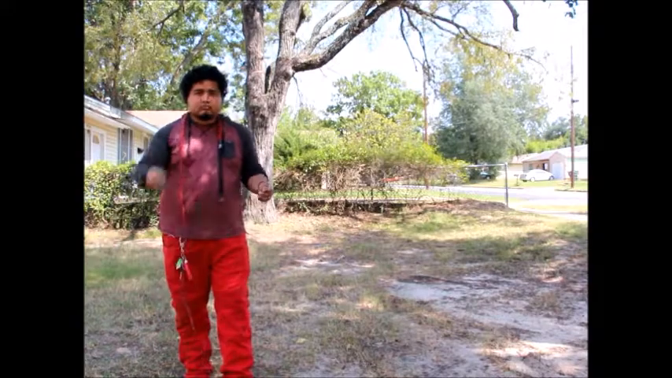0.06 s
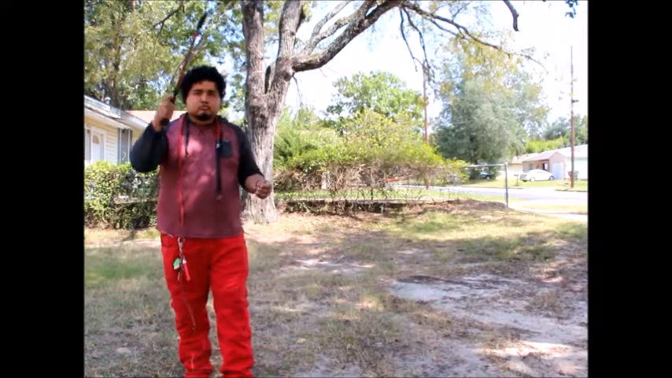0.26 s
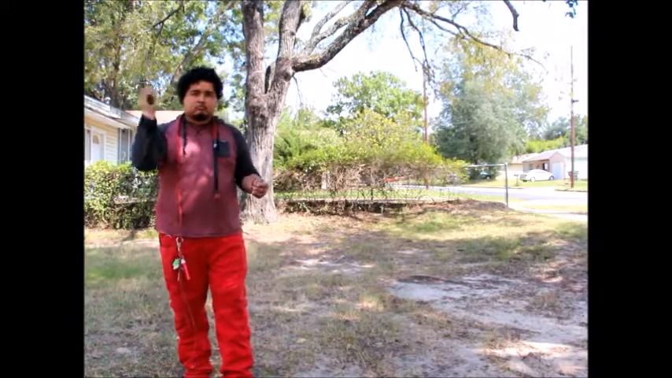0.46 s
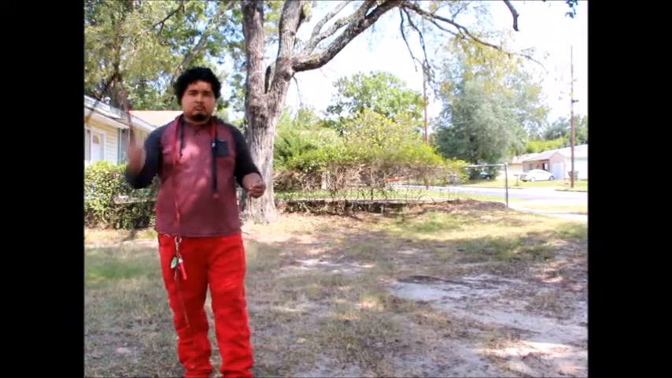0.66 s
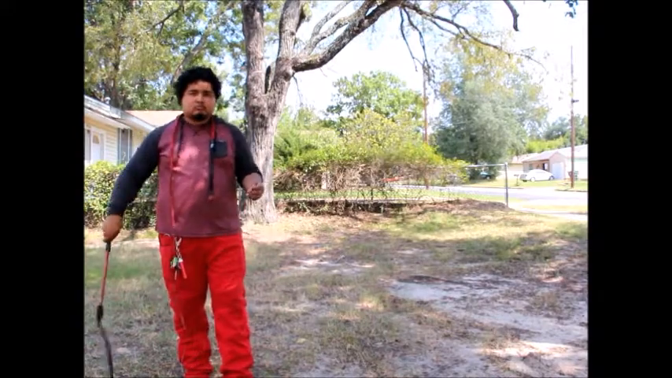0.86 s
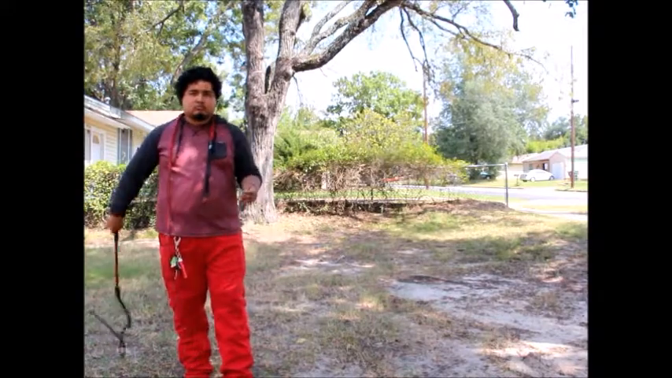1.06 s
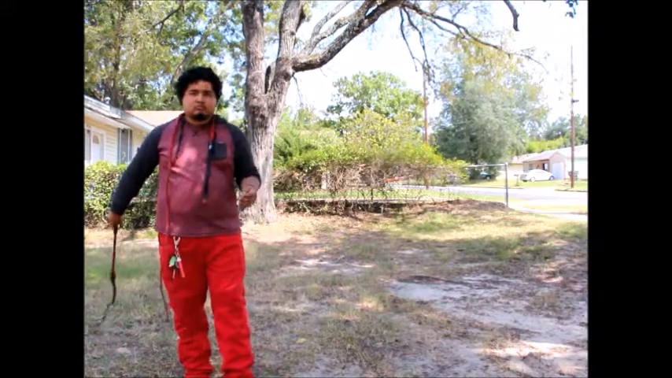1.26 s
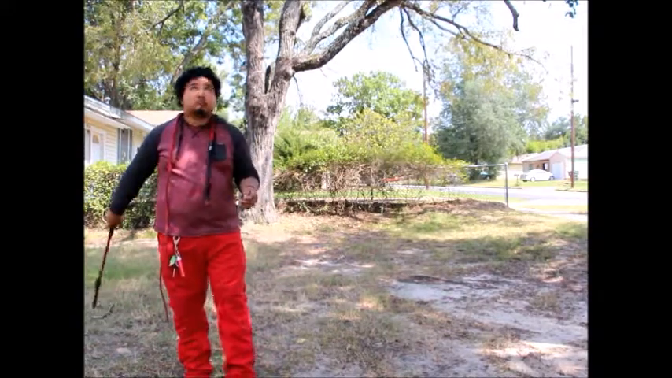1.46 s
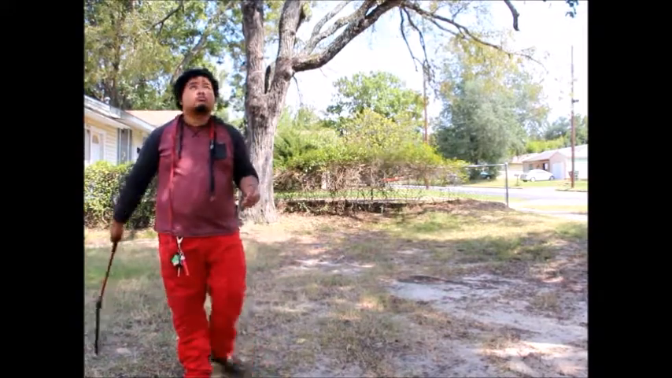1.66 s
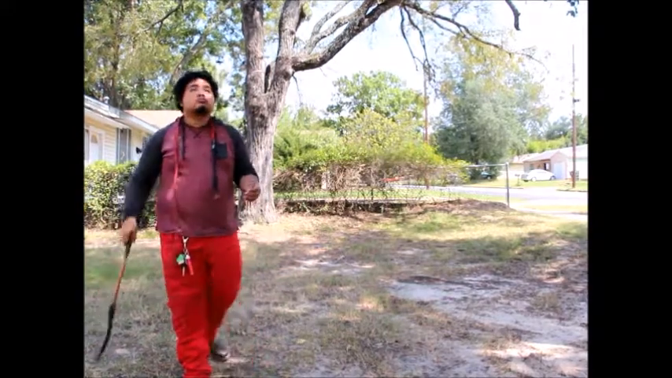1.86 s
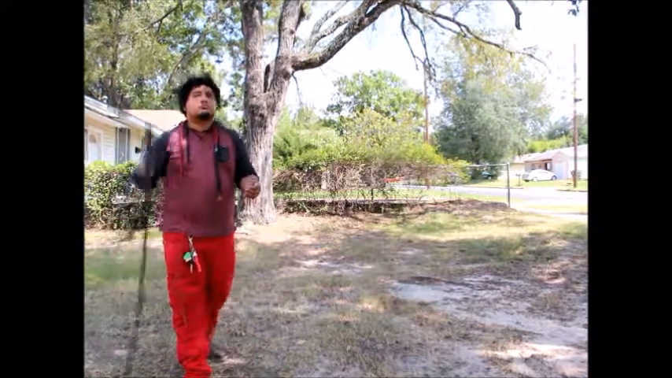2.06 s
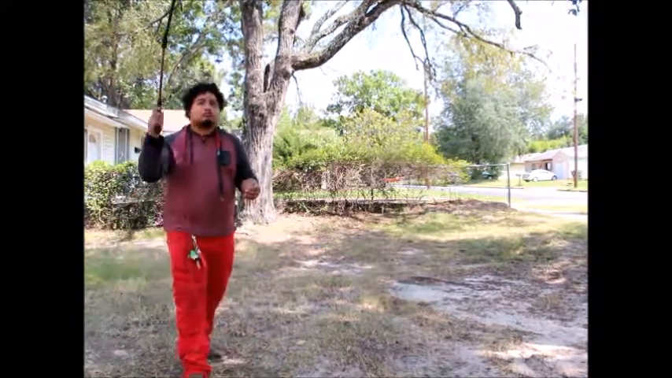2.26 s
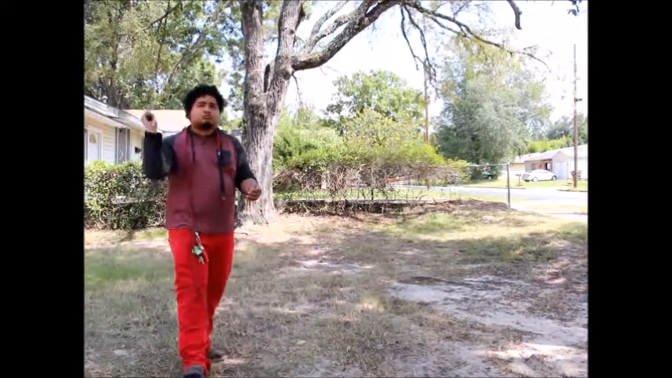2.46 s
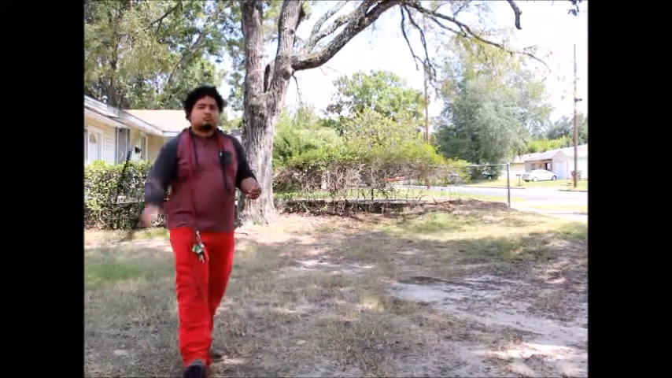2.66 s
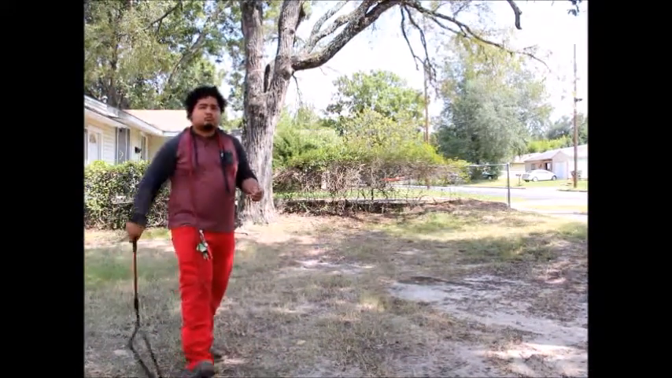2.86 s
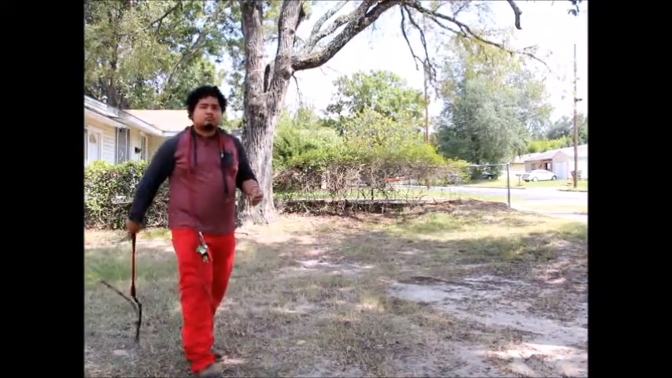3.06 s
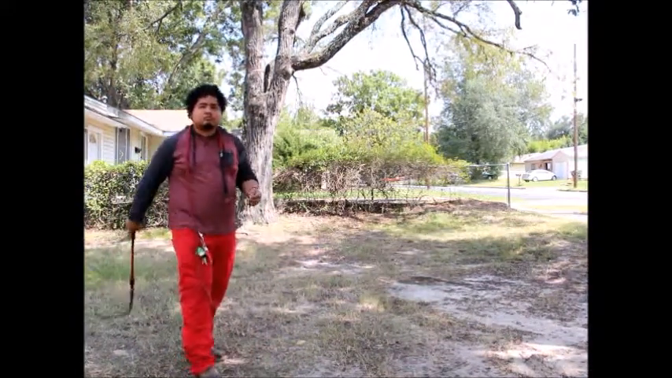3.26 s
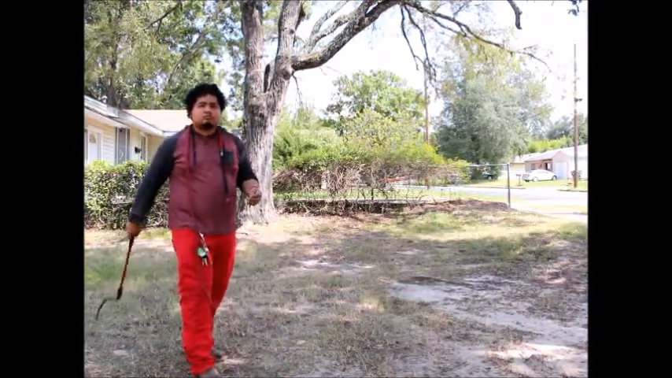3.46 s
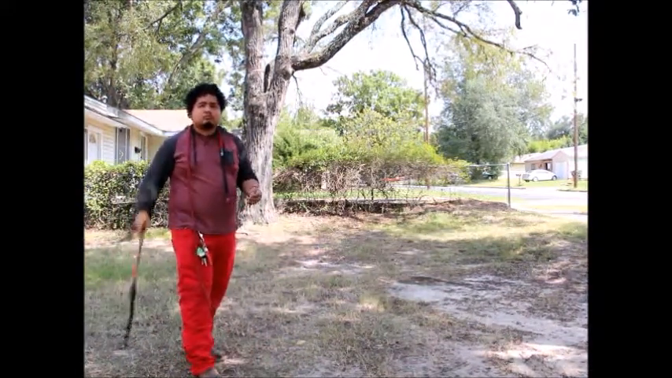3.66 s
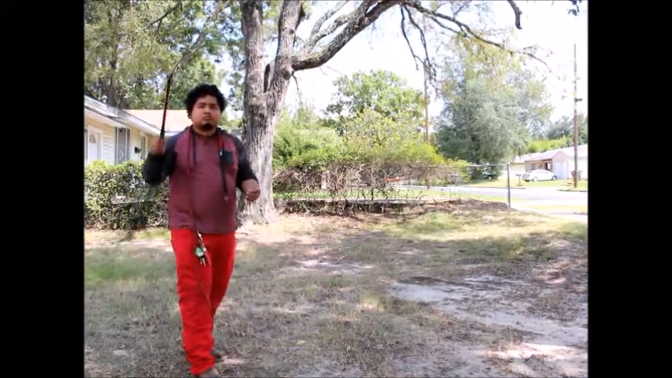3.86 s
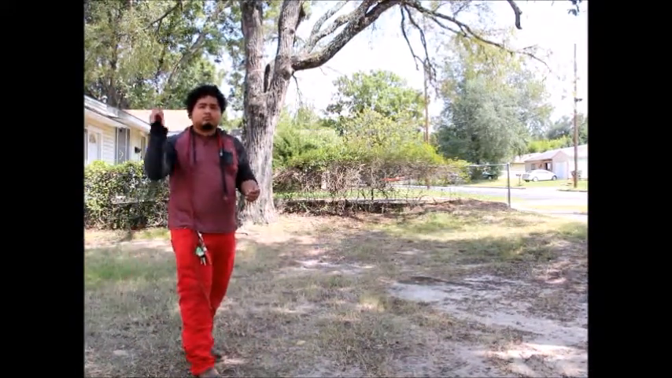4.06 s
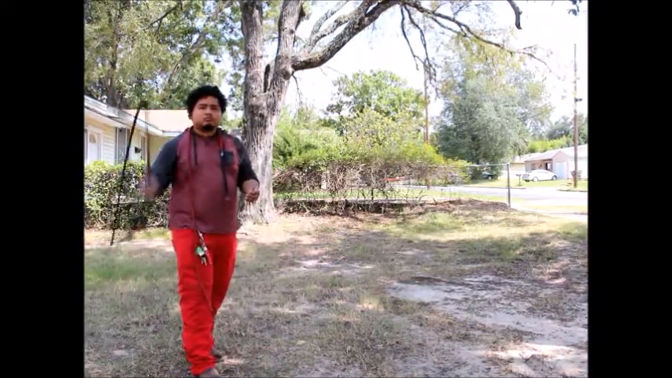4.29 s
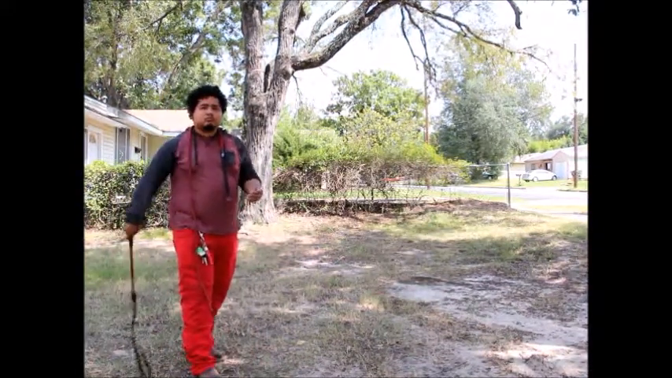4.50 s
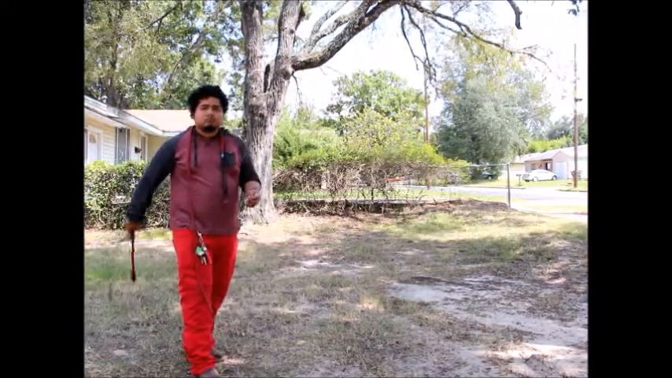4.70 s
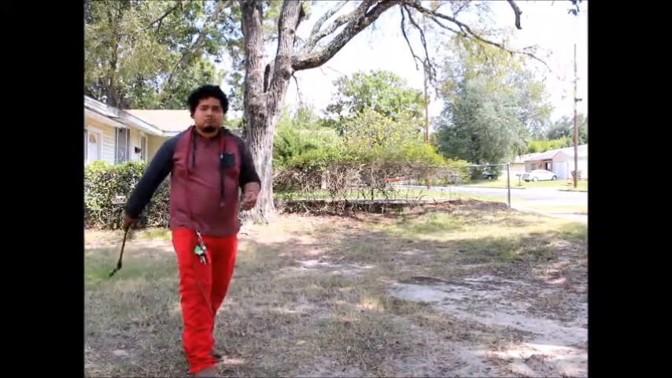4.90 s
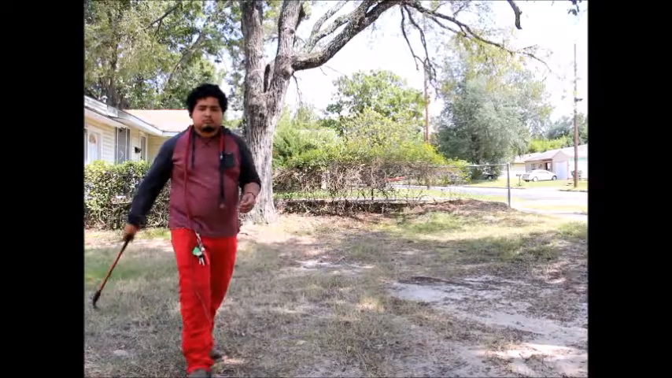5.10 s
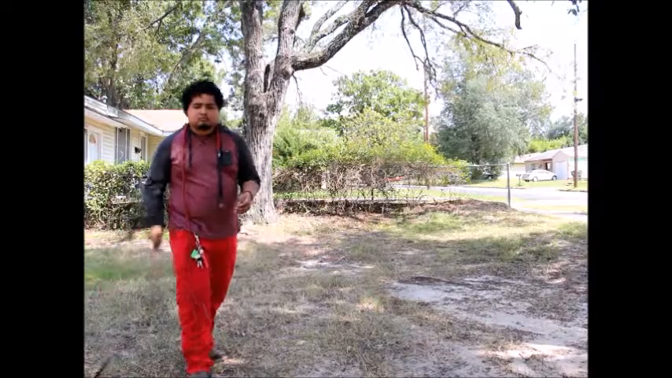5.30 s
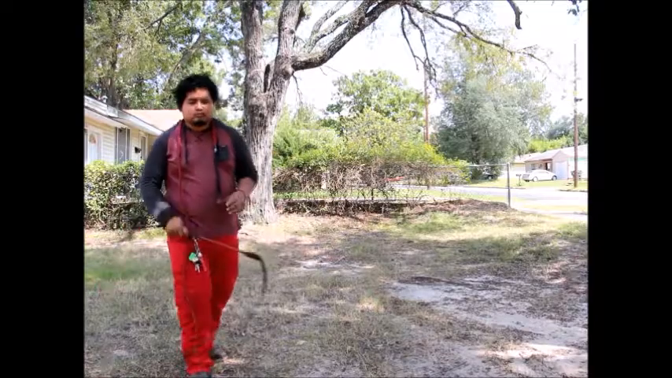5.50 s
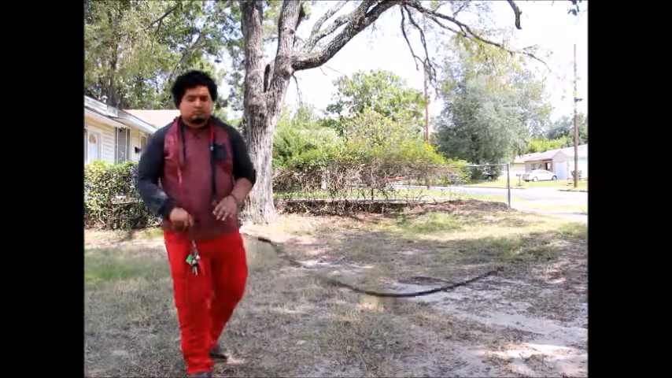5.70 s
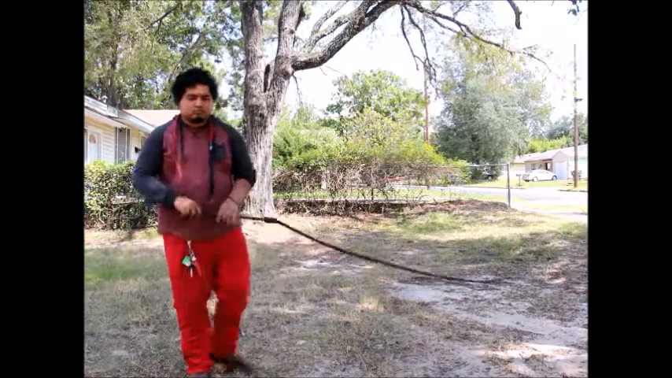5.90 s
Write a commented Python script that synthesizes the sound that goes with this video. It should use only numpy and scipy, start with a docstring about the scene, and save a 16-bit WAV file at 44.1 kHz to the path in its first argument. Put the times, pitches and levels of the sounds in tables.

```python
"""A whip cracks three times in a yard: a rush, a climbing chirp, two shock fronts in crackle, overload.
Foliage and walls return each crack as fading noise and ringing echoes while a gain control dips the level.
The swung thong whistles by vortex shedding (tones that wander about a moving pitch); its tip hisses.
Ticks are noise puffs, snaps are damped rings and dry grass rustles as grainy noise.
Far traffic and leaves lie below as patchy banded noise with faint drones."""
import sys
import numpy as np
from scipy import signal
from scipy.io import wavfile
from scipy.ndimage import uniform_filter1d, minimum_filter1d

SR = 44100
rng = np.random.default_rng(int(sys.argv[2]) if len(sys.argv) > 2 else 0)


def materialize(psi):
    """Save the field psi as 16-bit PCM at rate SR to the path in sys.argv[1].

    A 1-D psi becomes a single channel; in a 2-D psi each row is a channel.
    """
    bounded = np.clip(np.atleast_2d(psi).T, -1, 1)
    quanta = np.round(bounded * 32767).astype(np.int16)
    wavfile.write(sys.argv[1], SR, quanta)


N = 261954
T = np.arange(N) / SR

# Scatter from grass nearby, then trunks and leaves farther off: t/s after the crack, level/dB
SCATTERING = [(.008, -37.5), (.013, -15.5), (.03, -10), (.08, -16), (.14, -11), (.205, -16), (.25, -16),
              (.34, -18.5), (.43, -22.5), (.75, -33), (1.1, -62)]


def from_db(db):
    """Level to amplitude: 20 dB is a factor of ten."""
    return 10 ** (np.asarray(db) / 20)


def rms_one(x):
    """Normalization: divide by the root mean square."""
    return x / np.sqrt(np.mean(np.abs(x) ** 2) + 1e-20)


def at_hz(points, hz):
    """Spectral interpolation, linear in the logarithm of frequency."""
    points = np.array(points)
    return np.interp(np.log(hz), np.log(points[:, 0]), points[:, 1])


def filtered(x, order, hz, kind):
    """Linear filtering with a maximally flat (Butterworth) passband."""
    return signal.sosfilt(signal.butter(order, hz, kind, fs=SR, output="sos"), x)


def drift(rate_hz, size=N):
    """Slow random fluctuation of rms 1: white noise through a double real pole."""
    r = np.exp(-2 * np.pi * rate_hz / SR)
    settle = 20000  # samples dropped while the filter settles
    noise = rng.standard_normal(size + settle)
    return rms_one(signal.lfilter([1], [1, -2 * r, r * r], noise)[settle:])


def panned(x, pan_db):
    """Amplitude panning: the left-right level difference is shared by both channels."""
    return x * from_db(np.array([[pan_db / 2], [-pan_db / 2]]))


def add(out, s, sound):
    """Superposition: mix a sound in from time s."""
    at = round(s * SR)
    out[..., at:at + sound.shape[-1]] += sound[..., :out.shape[-1] - at]


def bands(size, lowest_hz, spikes=0):
    """Third-octave noise of equal density per Hz, with interchannel correlation set by mid and side."""
    # Left-right correlation, clipped to 0..1 on reading: f/Hz, correlation
    correlation = [(60, 0.1), (150, 0.4), (380, 0.7), (950, 0.62), (2380, 0.42), (5980, 0), (15000, -18)]
    edges = 16500 / 2 ** (np.arange(30) / 3)
    white = rng.standard_normal((2, 2, size)) + spikes
    for k, (high, low) in enumerate(zip(edges, edges[1:])):
        hz = np.sqrt(low * high)
        if hz > lowest_hz:
            # neighbouring bands draw on separate noise
            mid, side = filtered(white[k % 2], 3, [low, high], "band")
            alike = np.clip(at_hz(correlation, hz), 0, 1)
            yield hz, np.sqrt(1 + alike) * mid + np.sqrt(1 - alike) * side * [[1], [-1]]


def coloured_noise(colour, lowest_hz):
    """Spectral shaping: weight each noise band by its level per Hz, then bring the sum to rms 1."""
    return rms_one(sum(from_db(at_hz(colour, hz)) * band for hz, band in bands(N, lowest_hz)))


def swells(rows):
    """Energy sum of gusts that climb 20 dB in the rise time and lose 20 dB in the fall time."""
    energy = 0
    for s, peak_db, rise_s, fall_s in rows:
        distance = np.where(T < s, (s - T) / rise_s, (T - s) / fall_s)
        energy = energy + from_db(peak_db - 20 * distance) ** 2
    return np.sqrt(energy)


def blip(hz, cycles):
    """Damped oscillation with a soft onset, scaled to peak 1."""
    turns = np.arange(600) / SR * hz
    wave = np.sin(2 * np.pi * turns) * turns ** 2 * np.exp(-6.0 * turns / cycles)
    return wave / np.abs(wave).max()


def wandering_tone(pitch, rough, width_hz):
    """Narrow-band noise: a carrier of rms about 1 modulated by a slow complex random envelope."""
    wander = 1 - rough + rough * (drift(width_hz) + 1j * drift(width_hz))
    carrier = np.exp(2j * np.pi * np.cumsum(pitch) / SR)
    return np.real(rms_one(wander) * carrier) * np.sqrt(2)


def run_up(t, run_db, top_hz):
    """Turbulent rush: band noise that brightens as the loop runs out and speeds up."""
    run_up_s = .0135
    rush = filtered(rng.standard_normal(len(t)), 1, [400, top_hz], "band")
    rush = filtered(rush, 1, 2 * top_hz, "low")
    dull = filtered(rush, 2, 1100, "low")
    rush = 1.9 * dull + (rush - dull) * np.clip(1.27 + t / run_up_s, 0, 1)
    onset = np.clip((t + run_up_s) / 0.0011, 0, 1)
    # rises at 67 dB/s up to the crack, then falls at 990 dB/s
    level_db = run_db + 67 * np.minimum(t, 0) - 990 * np.maximum(t, 0)
    return rms_one(rush) * onset * from_db(level_db)


def tip_chirp(t, final_hz):
    """Frequency sweep: the tip's whistle climbs and swells exponentially up to the crack."""
    pitch = final_hz * np.exp(np.minimum(t, 0) / 0.0048)
    return np.sin(2 * np.pi * np.cumsum(pitch) / SR) * from_db(-0.5 + 7200 * t) * (t < 0)


def shock_fronts(t, gain_db, second_s):
    """Shock waves of the supersonic tip: suction, push, then suction split by the second front."""
    gaps = t / second_s  # time in units of the gap between the shocks
    wave = -np.exp(-((gaps - .15) / .15) ** 2)
    wave += .5 * np.exp(-((gaps - .55) / .2) ** 2)
    wave -= np.exp(-((gaps - 1.15) / .3) ** 2)
    wave += 1.6 * np.exp(-((gaps - 1.22) / .05) ** 2)
    wave -= .4 * np.exp(-((gaps - 1.6) / .45) ** 2)
    # the microphone membrane swings back slowly afterwards
    return filtered(from_db(gain_db) * wave, 2, 70, "high")


def crackle(t, start_db, hz, second_s):
    """Decaying band noise around the shocks, partly correlated between the channels."""
    mid, side = rng.standard_normal((2, len(t)))
    fizz = filtered(mid + 0.74 * side * [[1], [-1]], 2, [.5 * hz, 1.34 * hz], "band")
    # the decay steepens 0.6 ms after the second shock
    decay_db = 4400 * t + 9900 * np.maximum(t - second_s - .0006, 0)
    return rms_one(fizz) * (t > 0) * from_db(start_db - decay_db)


def crack(run_db, rush_hz, chirp_hz, shock_db, second_s, crackle_db, crackle_hz):
    """Superposition of rush, chirp, shock fronts and crackle, begun 20 ms before the first shock."""
    t = np.arange(2200) / SR - .02
    out = run_up(t, run_db, rush_hz) + tip_chirp(t, chirp_hz)
    return out + shock_fronts(t, shock_db, second_s) + crackle(t, crackle_db, crackle_hz, second_s)


def yard_reply(scatter_db, tilt_db, shift, size):
    """Diffuse scattering: dense small echoes lose treble to the air with flight time, and some glint."""
    # Colour of the scatter before shift and tilt: f/Hz, level/dB per Hz
    scatter_colour = [(250, -28), (500, -16), (900, -6.5), (1800, -0.5), (3500, 4.5), (5500, 0.5),
                      (8000, -4.5), (12000, -10.5), (16000, -19.5)]
    air_loss_db, air_power = 37, 1.46  # dB per s of flight at 5 kHz; exponent of its growth with frequency
    t = np.arange(size) / SR
    # glints from trunks and boughs: sparse spikes, 350 per second on average, of either sign
    struck = rng.random((2, size)) < 350 / SR
    glint_db = 12 + 3 * np.minimum(rng.exponential(1, (2, size)), 3)
    glints = struck * from_db(glint_db) * rng.choice([-1, 1], (2, size))
    out = np.zeros((2, size))
    for hz, band in bands(size, 200, spikes=glints):
        colour_db = at_hz(scatter_colour, hz / 2 ** shift) + tilt_db * np.log2(hz / 3000)
        out += band * from_db(colour_db - air_loss_db * t * (hz / 5000) ** air_power)
    clumps_db = 1.2 * drift(300, size=size) + 1.0 * drift(20, size=size)
    return out * from_db(np.interp(t, np.transpose(SCATTERING)[0], scatter_db) + clumps_db)


def echo(s, level_db, pan_db, hz, cycles):
    """Specular reflection: a wall returns both shocks as soft damped rings."""
    shock_gap_s = 0.0015
    out = np.zeros((2, N))
    add(out, s, panned(from_db(level_db - 8.5) * blip(0.77 * hz, cycles), pan_db))
    add(out, s + shock_gap_s, panned(from_db(level_db) * blip(hz, cycles), pan_db))
    return out


def cracks():
    """Direct sound and reverberation: each crack, its diffuse wash and its hard echoes."""
    # Cracks: t/s, run-up level/dB, rush top f/Hz, final chirp f/Hz, shock gain/dB,
    # second shock t/s after the first, crackle starting level/dB, crackle f/Hz
    crack_events = [(0.8734, -21.5, 1230, 3046, 5, 0.0015, 4, 7470),
                    (2.7966, -16.5, 3330, 3300, 7.5, .0016, 2, 8600),
                    (4.4616, -13.5, 2760, 2630, 7, 0.000905, -3, 6250)]
    # The yard's reply to each crack: wash level/dB, extra fading/(dB/s), tilt/(dB/octave),
    # colour shift/octave, nearest echo peak level/dB, dull knock peak level/dB
    replies = [(-3, 4.5, 2, 0.24, -2, -18), (-0.5, 2.1, 2, .05, 4, -14), (1, 0.6, 2.5, -0.19, -6, -12.5)]
    # Walls and trunks: t/s after the crack, left-right level/dB, f/Hz, decay/cycles,
    # peak level/dB after the first, second and third crack
    walls = [(0.0997, -1, 4057, 2.45, -15, -32, -30), (0.147, -9.5, 3030, 1.67, -30, -10, 0),
             (0.1829, -3, 4280, 1.87, -25, 7, 1), (0.2153, -5, 4140, 6.2, -17, -12, -26),
             (.2446, -4, 2600, 1.6, -37, -22, -4.5), (.2753, 4, 2760, 7, -32, -15, -19),
             (.2954, -6, 2350, 2.7, -33, -15, -13), (0.4736, 4, 2700, 0.82, -19, -23.5, -22.5),
             (0.6492, -1.5, 2800, 1.5, -22, -23, -22)]
    # Nearest echo: left-right level/dB, f/Hz, decay/cycles
    nearest = (-7.5, 4300, 1.3)
    # Delay of the nearest echo, one value a crack: t/s
    nearest_delays = [.047, .0209, .0258]
    # Dull knock from a far wall: t/s after the crack, left-right level/dB, f/Hz, decay/cycles
    far_knock = (.2156, 1.6, 960, 3)
    out = np.zeros((2, N))
    after_s, scatter_db = np.transpose(SCATTERING)
    for k, (s, *shape) in enumerate(crack_events):
        wash_db, fading, tilt_db, shift, near_db, knock_db = replies[k]
        add(out, s - .02, crack(*shape))
        reply_db = scatter_db + wash_db - fading * after_s
        add(out, s, yard_reply(reply_db, tilt_db, shift, size=round(1.1 * SR)))
        out += echo(s + nearest_delays[k], near_db, *nearest)
        for lag_s, pan_db, hz, cycles, *levels_db in walls:
            out += echo(s + lag_s, levels_db[k], pan_db, hz, cycles)
        lag_s, pan_db, hz, cycles = far_knock
        add(out, s + lag_s, panned(from_db(knock_db) * blip(hz, cycles), pan_db))
    return out


def stretches(tables):
    """Piecewise-linear control curves, and a soft gate that is open inside the tables."""
    s, *columns = np.concatenate(tables).T
    gate = sum((T >= rows[0][0]) & (T <= rows[-1][0]) for rows in tables) > 0
    return uniform_filter1d(gate * 1., size=500), [np.interp(T, s, column) for column in columns]


def swish():
    """Vortex shedding: lift tone, tones of slower and faster thong, drag tone at the octave, wake and hiss."""
    # Swings of the thong, one table a stretch: t/s, shedding f/Hz, main whistle level/dB
    swings = [
        [(.235, 550, -62), (.258, 723, -30.5), (.272, 1160, -27.5), (.281, 1602, -12.5), (.293, 1216, -25.5),
         (.32, 980, -32), (.37, 727, -55.5)],
        [(.67, 591, -55), (.755, 980, -43.5), (.77, 1243, -34.5), (.81, 1030, -44.5), (.84, 886, -50),
         (.858, 766, -32)],
        [(2.205, 818, -70), (2.22, 1092, -27), (2.23, 1512, -16.5), (2.256, 1118, -17.5), (2.268, 985, -35.5),
         (2.33, 793, -49)],
        [(2.6, 684.4, -58), (2.68, 945, -36), (2.7, 1195, -35.5), (2.72, 982, -39.5), (2.75, 868, -35.5),
         (2.782, 851, -32.5)],
        [(3.925, 1000, -55), (3.94, 1228, -23), (3.958, 1425, -21), (3.98, 1035, -21), (4.02, 899, -37.5)],
        [(4.021, 900, -38), (4.06, 738, -38), (4.11, 578, -40.5), (4.15, 527, -40), (4.19, 620, -53.5)],
        [(4.191, 618.6, -56), (4.225, 950, -38.5), (4.25, 820, -52.5), (4.3, 853, -38), (4.35, 1018, -45),
         (4.42, 800, -42.5), (4.448, 780, -49.5)],
        [(5.59, 488, -47.5), (5.62, 555.4, -33), (5.635, 747, -45), (5.645, 870, -33.5), (5.675, 791, -41.5),
         (5.7, 722, -52.5)],
    ]
    # Gain of the other strands beside a -45 dB whistle, before each tone's own offset, by stretch: level/dB
    spreads = [3, 7.5, 0.1, 4, 5, -0.5, 2.5, -2]
    # Hiss of the tip at its fastest: t/s, level at the peak/dB, rise/s, fall/s
    tip_hiss = [(.286, -18, 0.002, 0.0062), (.312, -45.5, 0.038, 0.06), (.77, -47, 0.026, 0.062),
                (.858, -44.5, 0.047, 0.0041), (2.235, -33.5, 0.017, 0.022), (2.26, -50, 0.025, 0.18),
                (2.7, -49.5, 0.02, .05), (2.782, -44, .1, 0.0038), (3.965, -45.5, 0.067, 0.13),
                (4.448, -41, 0.066, .004), (5.64, -73, 0.062, 0.11)]
    # Colour of the tip's hiss: f/Hz, level/dB per Hz
    hiss_colour = [(3300, -3), (6000, 4.7), (9000, -12), (16000, -23.5)]
    tables = [np.c_[rows, np.full(len(rows), db)] for rows, db in zip(swings, spreads)]
    gate, (pitch, level_db, spread_db) = stretches(tables)
    # a louder whistle stands more alone: the strands lose 0.28 dB per dB
    strands = from_db(spread_db - 0.28 * (level_db + 45))
    # the more of the thong sheds, the more ragged the main whistle
    tone = wandering_tone(pitch, rough=np.clip(.5 * strands, 0, .95), width_hz=110)
    tone += strands * from_db(-9.5) * wandering_tone(.72 * pitch, rough=0.7, width_hz=190)
    tone += strands * from_db(-11) * wandering_tone(1.55 * pitch, rough=.85, width_hz=150)
    tone += from_db(-19) * wandering_tone(2 * pitch, rough=.6, width_hz=120)
    # wake noise: a fast, wide wander
    tone += strands * from_db(-18.5) * wandering_tone(2.9 * pitch, rough=0.58, width_hz=1100)
    whistle = gate * from_db(level_db) * panned(tone, 0.78)
    return whistle + swells(tip_hiss) * coloured_noise(hiss_colour, 3300)


def ticks():
    """Transients: ticks of thong, handle and grass are decaying noise puffs."""
    # Ticks: t/s, peak level/dB, left-right level/dB, lowest f/Hz, highest f/Hz, fall by a factor e^2/s
    tick_events = [(0.438, -34, -2, 3000, 12700, 0.017), (0.596, -37, .1, 5000, 12200, 0.001),
                   (1.4245, -46, 7, 7000, 10900, .002), (1.674, -34.5, -2, 2200, 4400, 0.0097),
                   (1.712, -40, 3, 2510, 9900, .004), (2.0, -46, 3, 8000, 14000, 0.0045),
                   (2.097, -43.5, 4, 5000, 10100, 0.0028), (2.337, -37.5, 6, 4500, 14040, 0.001),
                   (3.87, -39.5, 2, 5500, 11930, 0.0015), (3.877, -38, 5, 4070, 12000, 0.0029),
                   (5.293, -42, 1, 3030, 15000, 0.0027), (5.591, -45, 7, 3000, 8960, 0.0036)]
    out, t = np.zeros((2, N)), np.arange(900) / SR
    for s, level_db, pan_db, low_hz, high_hz, length_s in tick_events:
        puff = rng.standard_normal(900) * np.exp(-2 * t / length_s)
        puff = filtered(puff, 2, [low_hz, high_hz], "band")
        add(out, s, panned(from_db(level_db) * puff / np.abs(puff).max(), pan_db))
    return out


def snaps():
    """Impulse response: the handle and the slack thong pulled tight each give one damped ring."""
    # Snaps: t/s, peak level/dB, left-right level/dB, f/Hz, decay/cycles
    snap_events = [(.4408, -26, -2, 1480, 1.6), (3.8493, -27.5, 1, 2250, 1.7), (3.876, -15, -1, 1800, 1.13),
                   (3.9446, -10.5, -0.5, 563, 1.16)]
    out = np.zeros((2, N))
    for s, level_db, pan_db, hz, cycles in snap_events:
        add(out, s, panned(from_db(level_db) * blip(hz, cycles), pan_db))
    return out


def rustle():
    """Friction noise of feet and thong in dry grass: a band hiss with rapid random grain."""
    # Rustles, before the grain: t/s, level at the peak/dB, rise/s, fall/s
    gusts = [(1.708, -45, 0.15, 0.13), (2.03, -54.5, 0.28, 0.18), (2.094, -59, .04, .09),
             (3.662, -55, .25, 0.2), (3.876, -45, 0.052, 0.11), (4.882, -39.5, 0.076, .11),
             (5.292, -42, 0.0071, 0.051), (5.31, -50.5, .01, .5), (5.594, -50, 0.032, .045)]
    # Colour of the rustle: f/Hz, level/dB per Hz
    rustle_colour = [(800, -12), (2500, 0.5), (5000, -9), (9000, -14), (16000, -30)]
    grain = from_db(2.15 * drift(180.0))
    return swells(gusts) * grain * coloured_noise(rustle_colour, 1200)


def drones():
    """Narrow-band noise: faint hums of far engines and insects, alike in both channels."""
    # Drones: f/Hz, rate of wander f/Hz, level/dB
    drone_bands = [(111.8, 31, -49), (327.5, 57, -56), (2230, 89, -66.5), (2905, 150, -67.5)]
    out = np.zeros(N)
    for hz, width_hz, level_db in drone_bands:
        out += from_db(level_db) * wandering_tone(np.full(N, hz), rough=0.72, width_hz=width_hz)
    return out


def yard():
    """Incoherent sum of far traffic and leaves: bands fluctuate together and apart, the lows swell most."""
    # Relative colour of the yard: f/Hz, level/dB per Hz
    yard_colour = [(12, -41), (20, -17), (169, -4.5), (263, -7), (302, -9), (497, -13.5), (555, -13),
                   (603, -13), (889, -18), (1680, -23.5), (1930, -26), (2280, -26), (3360, -30),
                   (7930, -38.5), (15000, -56)]
    # Swell of the far hum, full only at the lowest frequencies: t/s, level/dB
    traffic = [(0, -0.5), (1.2, 0.5), (2.0, -1.5), (3.2, -0.3), (3.7, 2), (4.9, -1.3), (5.3, 3), (5.94, -6)]
    yard_db = -42.5  # rms level of the banded noise
    together, swell_db = drift(1.0), np.interp(T, *np.transpose(traffic))
    out = np.zeros((2, N))
    for hz, band in bands(N, 25):
        patchy_db = 0.61 * together + 1.9 * drift(4.6)
        out += band * from_db(at_hz(yard_colour, hz) + patchy_db + swell_db / (1 + hz / 800))
    return from_db(yard_db) * rms_one(out)


def scene():
    """Linear superposition of all sources in the open air."""
    return cracks() + swish() + ticks() + snaps() + rustle() + yard() + drones()


def left_port(x):
    """First-order shelf: the left port hears less bass than treble."""
    bass_db, treble_db, turn_hz = -9.5, -1.0, 2580
    treble = signal.lfilter(*signal.butter(1, turn_hz, "high", fs=SR), x)
    return from_db(bass_db) * x + (from_db(treble_db) - from_db(bass_db)) * treble


def gain_cut_db(x):
    """Level compression: a loud right channel cuts the gain, which holds, then lets go."""
    power = signal.lfilter([.01], [1, -.99], np.clip(x[1], -1, 1) ** 2)
    level_db = 10 * np.log10(power + 1e-12)
    cut_db = np.clip(4 * (level_db + 9), 0, 14)
    # hold the greatest cut of the last 4001 samples, then release at 110 dB/s
    held = -minimum_filter1d(-cut_db, size=4001, origin=2000)
    fall = 110 * T
    held = np.maximum.accumulate(held + fall) - fall
    r = np.exp(-1 / (0.017 * SR))  # smoothed with a 17 ms time constant
    return signal.lfilter([1 - r], [1, -r], held)


def record(dry):
    """Transduction: port colour, preamp hiss, gain control, overload by clipping, top cut."""
    hiss_db = -63.5
    stop_hz = 15900 * 1.03  # 60 dB down from here up
    x = np.array([left_port(dry[0]), dry[1]])
    cut_db = gain_cut_db(x)
    x = x + from_db(hiss_db) * rng.standard_normal(x.shape)
    x = np.clip(x * from_db(-cut_db), -1, 1)
    return signal.sosfilt(signal.cheby2(12, 60, stop_hz, fs=SR, output="sos"), x)


dry = scene()
out = record(dry)
materialize(out)
```